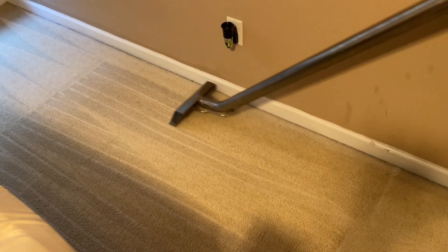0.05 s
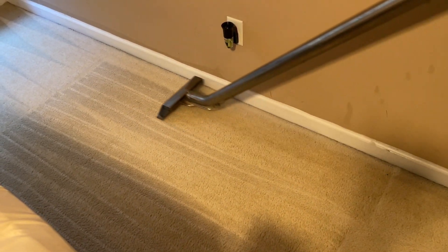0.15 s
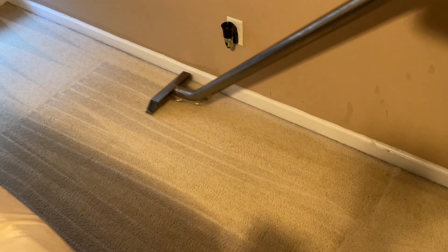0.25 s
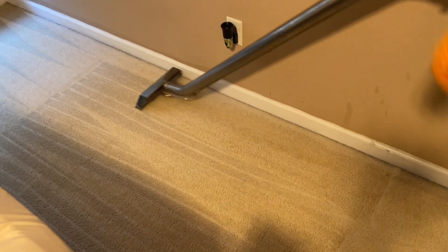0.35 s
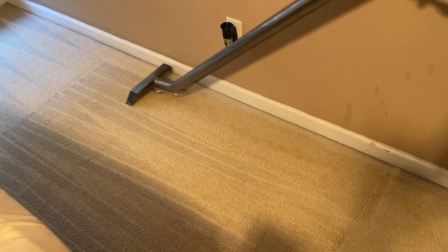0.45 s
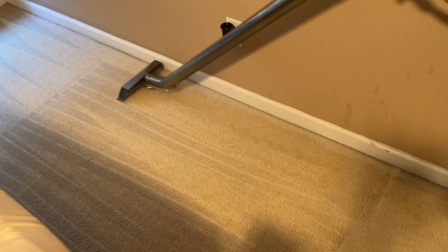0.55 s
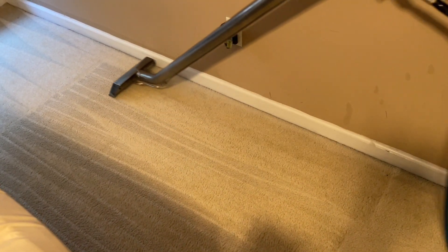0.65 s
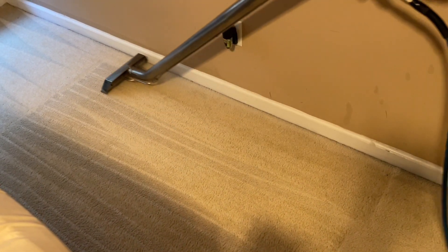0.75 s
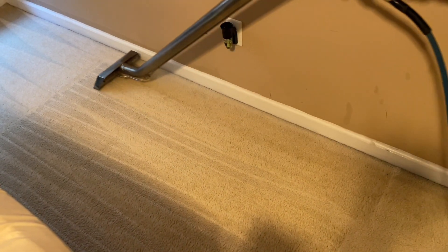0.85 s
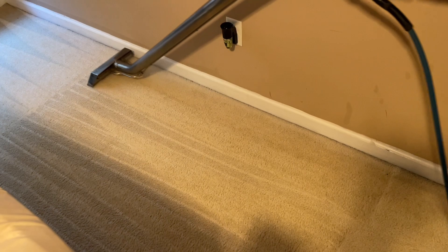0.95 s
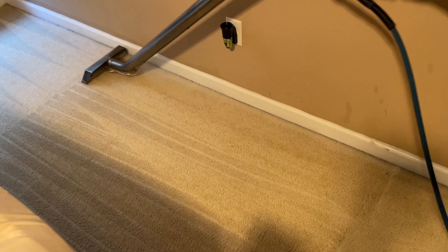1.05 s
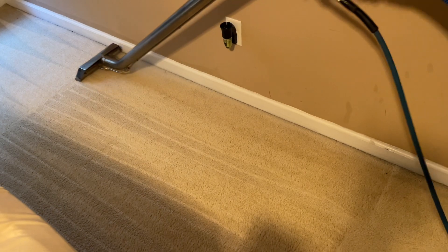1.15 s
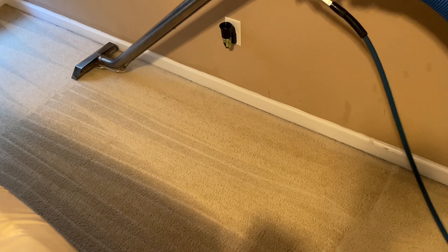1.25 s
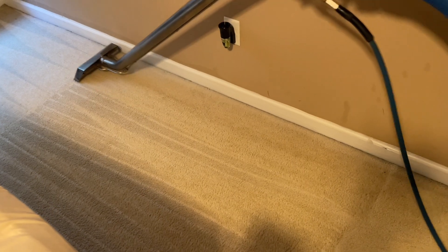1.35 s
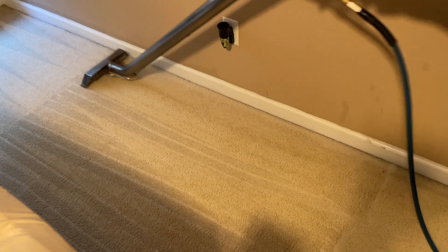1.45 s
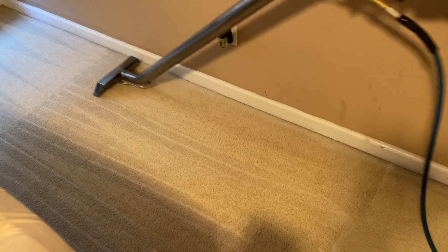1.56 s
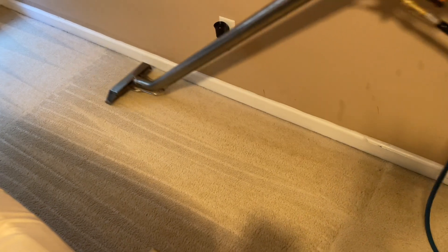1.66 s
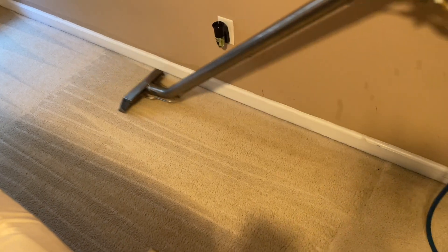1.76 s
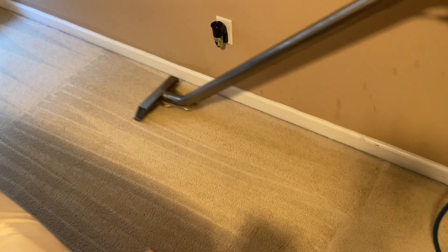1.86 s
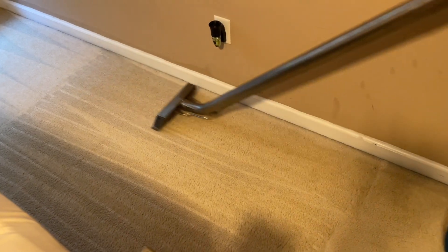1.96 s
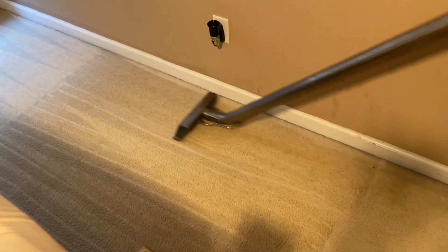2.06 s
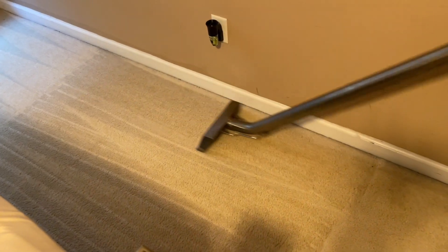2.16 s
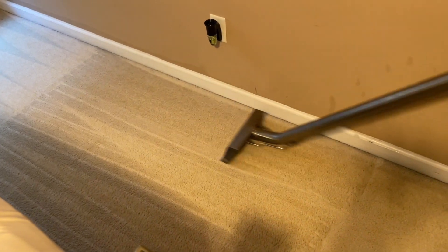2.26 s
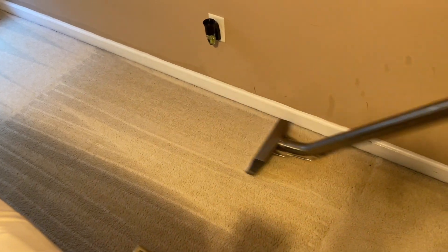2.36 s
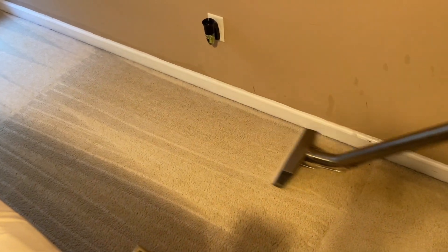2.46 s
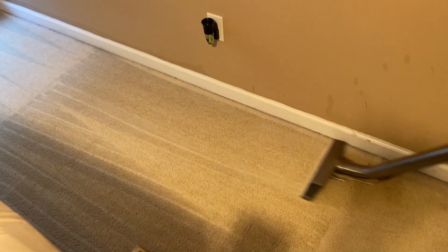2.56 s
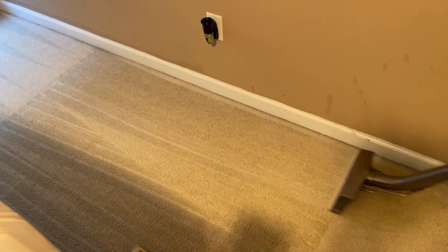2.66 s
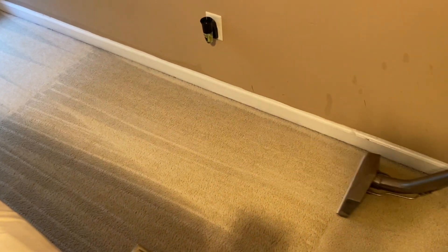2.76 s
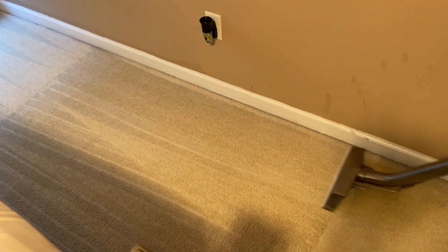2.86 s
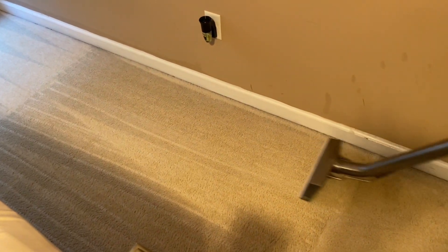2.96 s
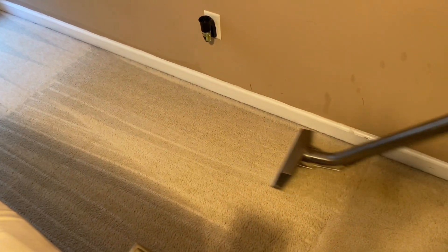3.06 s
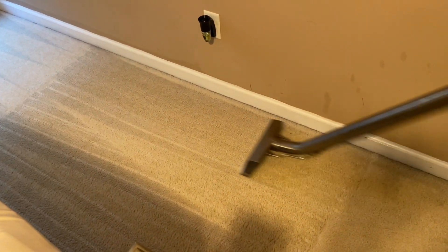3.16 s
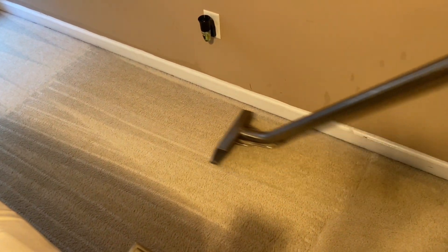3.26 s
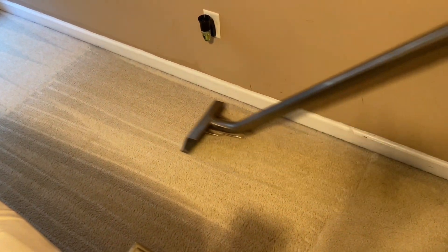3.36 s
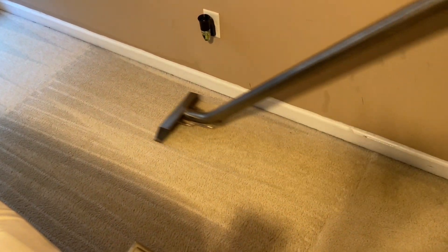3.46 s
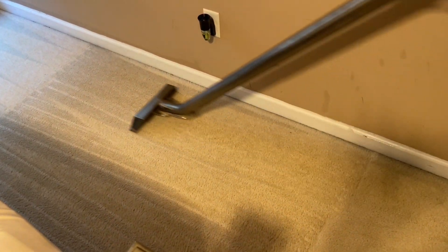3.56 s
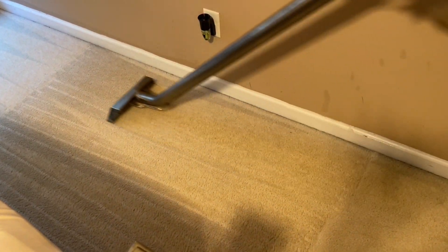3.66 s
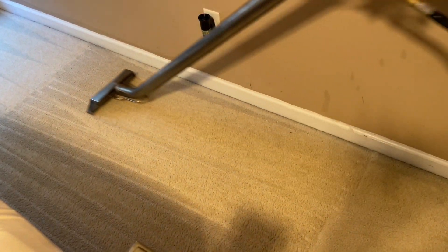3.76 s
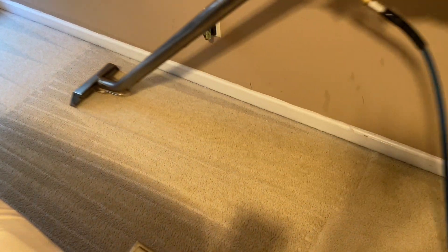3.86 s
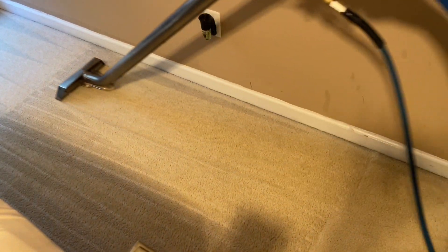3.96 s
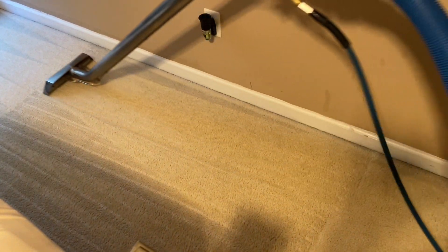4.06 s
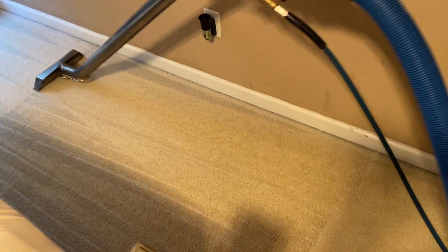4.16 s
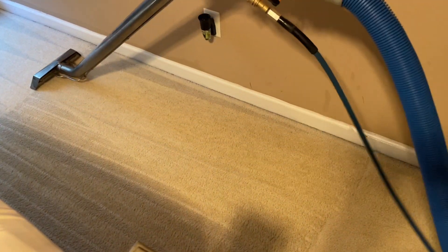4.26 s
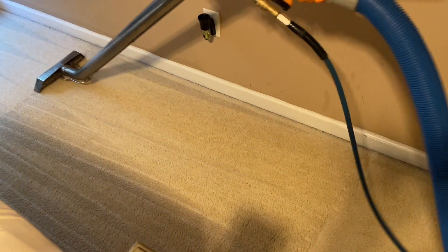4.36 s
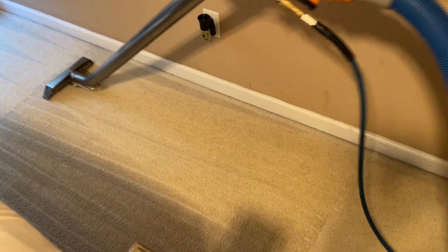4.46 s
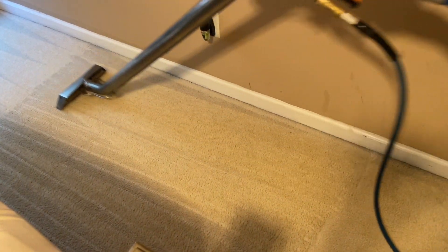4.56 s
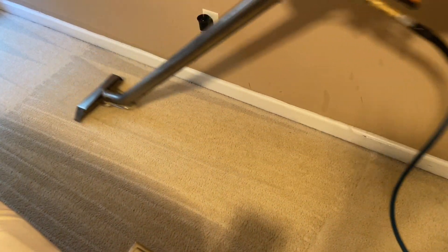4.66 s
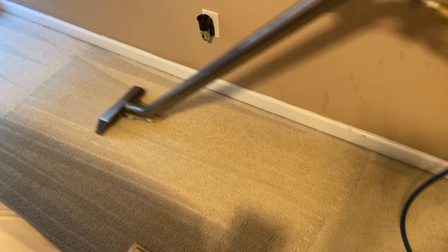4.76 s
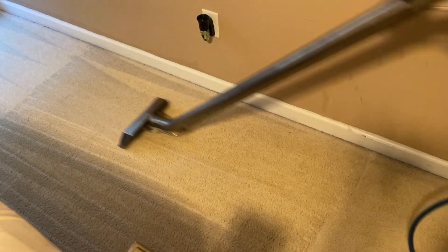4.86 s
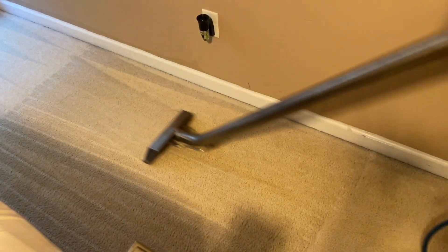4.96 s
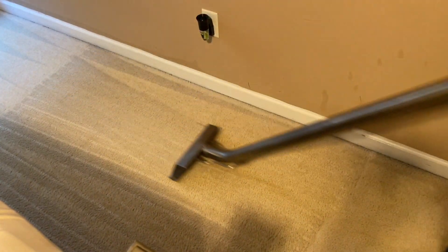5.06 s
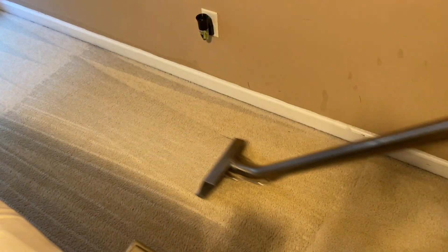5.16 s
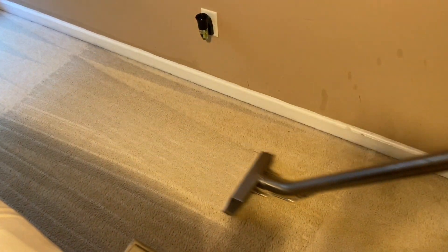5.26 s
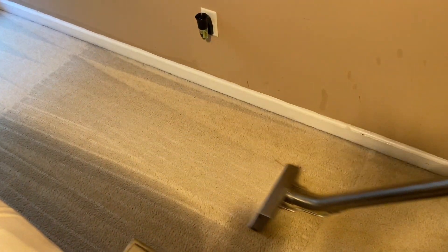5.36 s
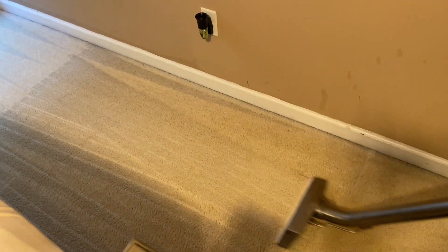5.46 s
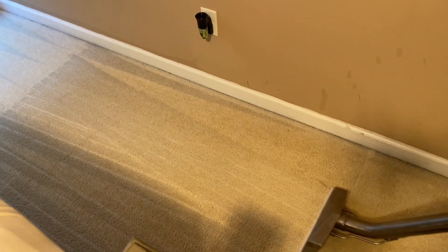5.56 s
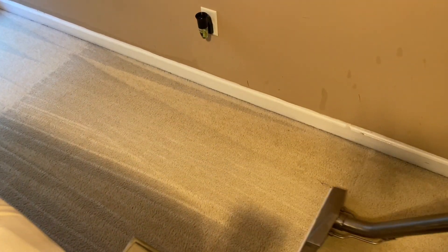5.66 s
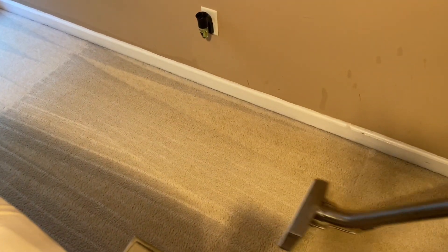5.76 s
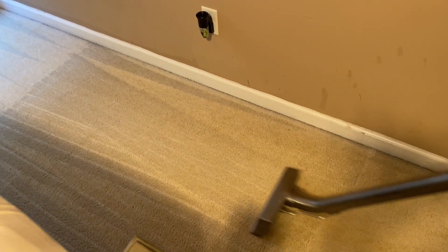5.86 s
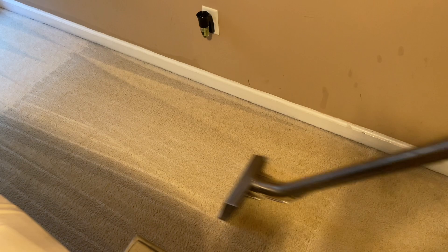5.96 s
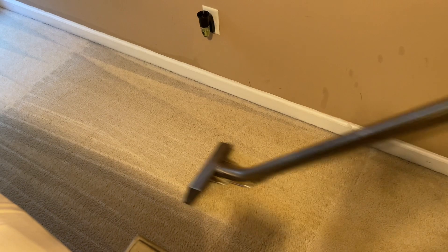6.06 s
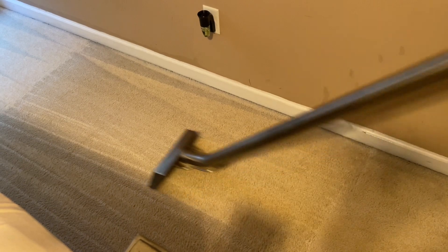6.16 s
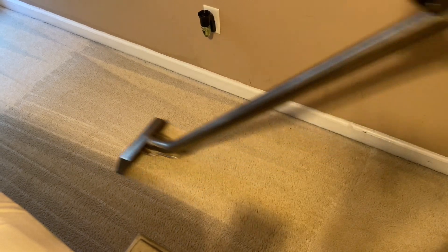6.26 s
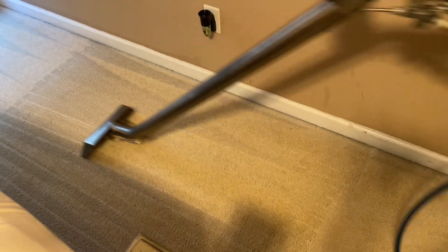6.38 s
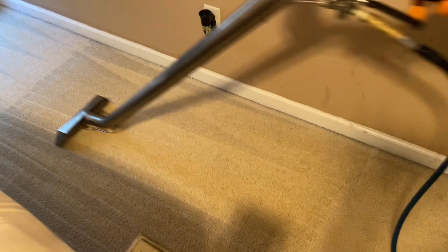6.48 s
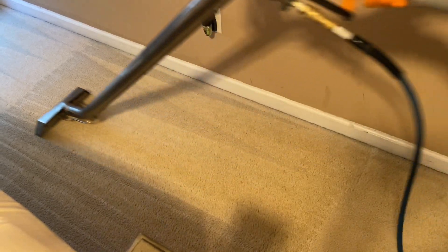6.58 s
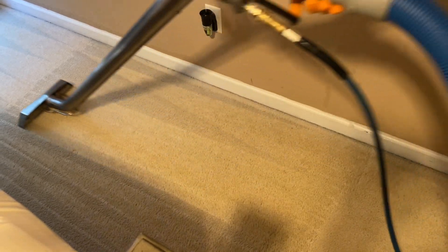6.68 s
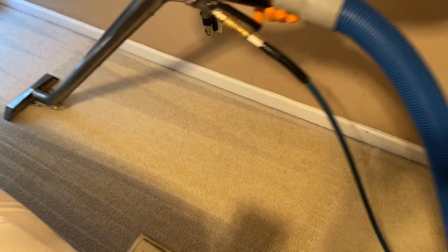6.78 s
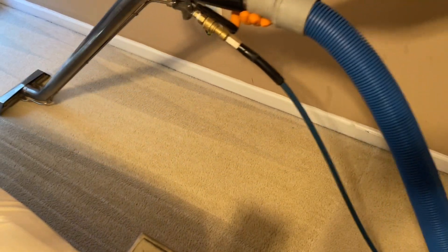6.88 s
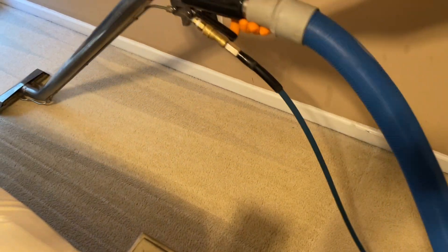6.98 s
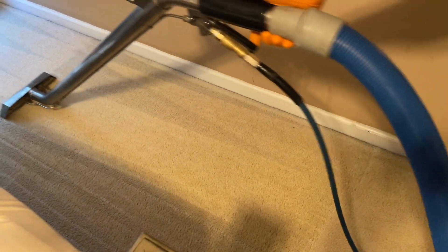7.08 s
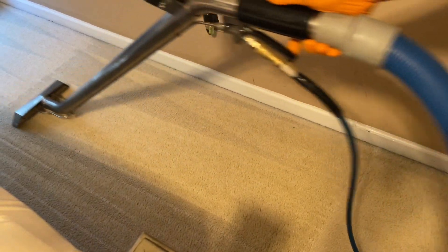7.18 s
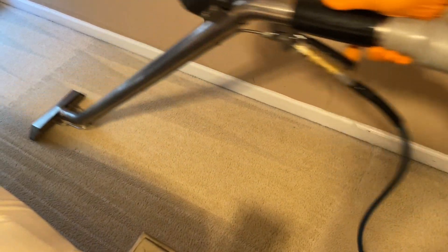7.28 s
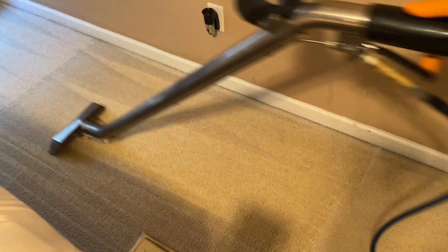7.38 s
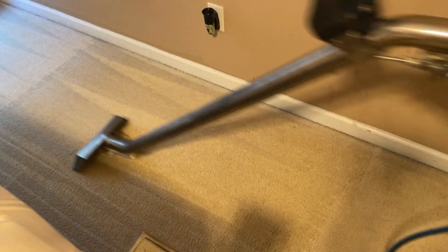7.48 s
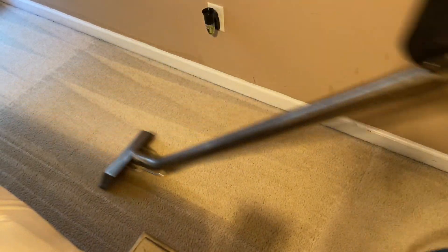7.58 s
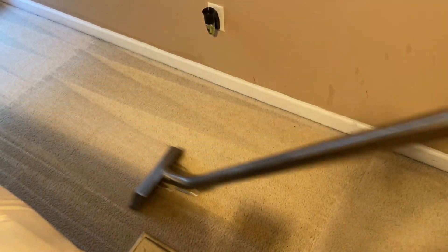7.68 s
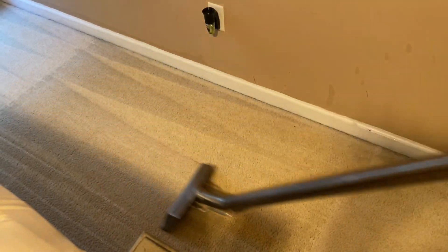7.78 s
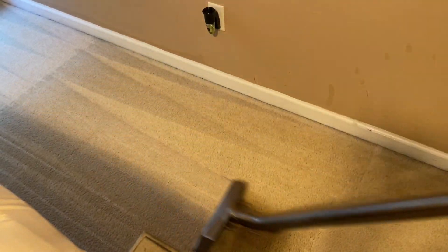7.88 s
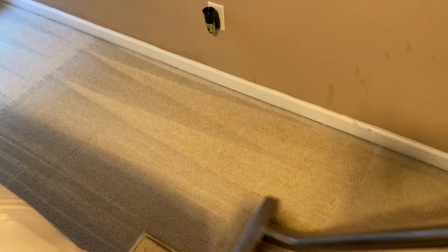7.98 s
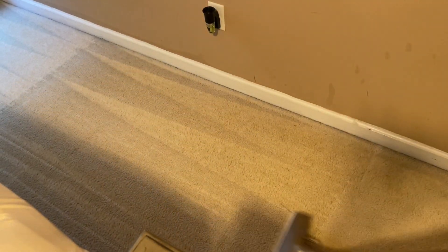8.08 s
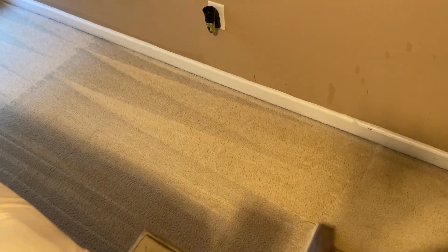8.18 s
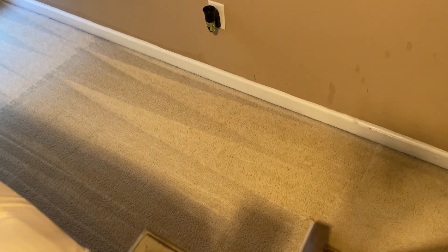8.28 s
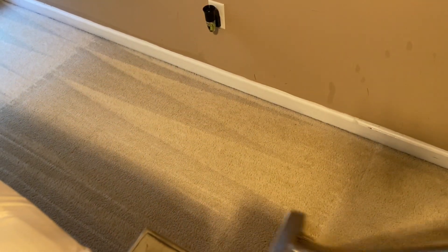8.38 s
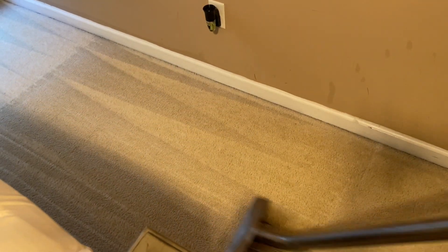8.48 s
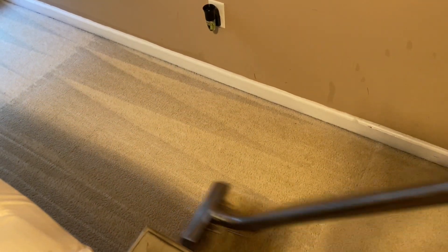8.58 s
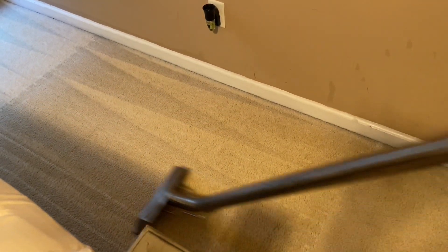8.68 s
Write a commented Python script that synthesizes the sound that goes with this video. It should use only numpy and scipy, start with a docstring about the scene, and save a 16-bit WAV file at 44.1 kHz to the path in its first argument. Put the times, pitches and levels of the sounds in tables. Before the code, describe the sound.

Steady spray over wet suction opens, then cuts off with a bright tick and tiny puff. Uneven gurgling slurps swell through three long pulls, with thinner, quieter pushes between. Raspy air and brief airy whistles come and go, the heavy hose rumbles, and dull thumps fall near some turns. Heard closely in stereo beside a wall in a small carpeted room.

```python
"""Carpet extraction wand along a wall

A wand works close by in a small carpeted room: three pulls and the pushes between them suck water from the pile.
Jets, a spray of noise and droplets, run for about a second until a valve shuts with a bright burst of noise.
Shaped noise and drops make gurgle, slurp, slot rush and fibre hiss; they rise in each stroke and fall slack at turns.
Gliding noise bands rasp, narrow ones whistle; low noise shudders the hose, and falling low tones are the wand's bumps.
A thin treble hiss sputters at the handle throughout; a hollow tube, a nearby wall and the room colour the head."""
import sys
import numpy as np
from scipy import signal
from scipy.fft import rfft, irfft, next_fast_len
from scipy.io import wavfile
from scipy.ndimage import map_coordinates

SR = 44100
rng = np.random.default_rng(int(sys.argv[2]) if len(sys.argv) > 2 else 0)


def store_wav(level_fs):
    """Save 16-bit WAV to argv[1]."""
    pcm = np.round(np.clip(np.atleast_2d(level_fs), -1, 1) * 32767)
    wavfile.write(sys.argv[1], SR, pcm.T.astype(np.int16))


N = 384993  # length in samples

# How loud the water jets are over time: time_s, level_db
JET_LEVELS = [(0, -30), (.3, -34), (.8, -33), (1.15, -34.5), (1.178, -43), (1.215, -48), (1.228, -34),
              (1.242, -46), (1.28, -53), (1.33, -76)]
# How far the head is pushed out along the wall: time_s, reach_0_to_1
HEAD_REACH = [(0, 0.6), (.75, 0.96), (1.3, 0.89), (1.8, 0.86), (2.75, 0.19), (3.5, 0.37), (4.2, 0.67),
              (4.75, 0.73), (5.62, 0.22), (6.5, 0.75), (7.0, 0.82), (7.5, 0.71), (8.27, 0.1), (8.73, 0.37)]
# Moments when the wand changes direction and the slot falls slack: time_s
TURN_TIMES = [-.3, 1.29, 2.82, 4.335, 5.7, 7.0, 8.33, 9.7]
# One row per stroke between turns, push and pull by turns; levels and let-go times are trimmed layer by layer below:
# water_arrives_s, seal_s, let_go_s, slack_rush_at_opening_turn_db, swell_along_stroke_db,
# gurgle_db, slurp_db, slot_rush_db, fibre_hiss_db, slot_pitch_hz, fibre_pitch_hz
STROKE_ROWS = [(.1, .1, 0.03, -42, -12.5, -34.5, -37.5, -37, -43, 2550, 4000),
               (0.2, 0.056, 0.17, -40, 3.5, -25, -32.5, -39.5, -40, 2500, 4650),
               (0.057, 0.12, 0.13, -45, -13.5, -31.5, -43.5, -50, -49.5, 2900, 4800),
               (0.07, 0.12, 0.19, -47, -1, -27.5, -32.5, -44.5, -44.5, 2420, 5000),
               (0.21, 0.18, 0.1, -45.5, -9, -35.5, -42.5, -52, -47.5, 2300, 4800),
               (0.11, 0.079, 0.23, -50.5, 2.5, -29.5, -35, -55, -43.5, 2430, 4800),
               (.19, 0.19, .1, -45, -0.5, -33, -45.5, -64, -52, 2480, 4900)]


def amp(db):
    """Turn decibels into a gain."""
    return 10 ** (np.asarray(db) / 20)


def unit(x):
    """Scale to rms 1."""
    return x / np.sqrt(np.mean(x ** 2) + 1e-20)


def along(points, hz):
    """Read (Hz, value) points on a log pitch axis."""
    f, v = np.transpose(points)
    return np.interp(np.log(hz + 1), np.log(f + 1), v)


def curves(rows):
    """One value per sample for each column after the time."""
    s, *cols = np.transpose(rows)
    return [np.interp(np.arange(N) / SR, s, c) for c in cols]


def wobble(rate):
    """A smooth random curve through so many random points a second."""
    points = rng.standard_normal(int(N * rate / SR) + 4)
    return map_coordinates(points, [np.arange(N) * rate / SR])


def swell(s, half_s):
    """A smooth bell of height 1 around time s; half_s is its standard deviation."""
    return np.exp(-.5 * ((np.arange(N) / SR - s) / half_s) ** 2)


def ease(x):
    """A soft step from 0 to 1 as x goes from 0 to 1."""
    return np.sin(np.pi / 2 * np.clip(x, 0, 1)) ** 2


def filtered(x, response):
    """Multiply the spectrum of x by a response that depends on frequency."""
    m = next_fast_len(N + SR // 4)
    return irfft(rfft(x, m) * response(np.fft.rfftfreq(m, 1 / SR)), m)[..., :N]


def white():
    """Turbulence: two unrelated streams of white noise."""
    return rng.standard_normal((2, N))


def drops(rate, spread_db):
    """Randomly timed droplet impacts of uneven size, rate of them a second, scaled to rms 1."""
    hits = rng.random(N) < rate / SR
    sizes = amp(spread_db * rng.uniform(-0.65, 1, N))
    return unit(hits * white() * sizes)


def voiced(drive, spectrum):
    """Colour two streams and spread them over a microphone pair; the average of left and right has rms 1."""
    # How alike the two microphones sound: frequency_hz, likeness_0_to_1
    likeness = [(30, .88), (70, .96), (150, .98), (350, .83), (680, .42), (1150, .64), (2200, .75),
                (3600, .5), (4700, .7), (5700, .35), (7200, .93), (9000, .85), (12800, .72), (14500, .9)]
    # How far the left microphone leads: frequency_hz, lead_radians
    left_lead = [(100, 0), (450, .3), (1000, 0), (1700, -.45), (2600, .6), (3300, .7), (4500, .1),
                 (5300, 0), (6100, -1.8), (7000, -3.1), (8000, -3.6), (9000, -4.4), (11000, -6.3),
                 (13500, -8.8), (15800, -10.2)]

    def mix(hz):
        """Share the colour between a common stream and one that differs in sign."""
        turn = np.arccos(np.clip(along(likeness, hz), 0, 1)) / 2
        return amp(along(spectrum, hz)) * np.array([np.cos(turn), np.sin(turn)])

    def lead(hz):
        """Turn left forward and right back by half the lead each."""
        return np.exp(.5j * np.outer([1, -1], along(left_lead, hz)))

    common, apart = filtered(drive, mix)
    pair = filtered(np.array([common + apart, common - apart]), lead)
    return pair / np.std(pair.mean(0))


def panned(x, left_db):
    """Make the left side louder than the right by left_db."""
    return x * amp(np.array([[.5], [-.5]]) * left_db)


def swept(x, centre_hz, width_hz, boost_db):
    """Pass x through a gliding resonance (a dip if boost_db is negative), keeping its overall level."""
    hz, t, z = signal.stft(x, SR, nperseg=1024)
    centre = np.interp(t, np.arange(N) / SR, centre_hz)
    gain = amp(boost_db / (1 + (2 * (hz[:, None] - centre) / width_hz) ** 2))
    out = signal.istft(z * gain, SR, nperseg=1024)[1][:, :N]
    return out * np.std(x) / np.std(out)


def jets():
    """Pressurised water hisses out and its droplets pepper the pile."""
    # Colour of the spray: frequency_hz, relative_level_db_per_hz
    spray_colour = [(150, -13), (500, 1), (850, -12), (1200, 4), (1600, -8), (1850, -4.5), (2300, -2),
                    (3400, -5.5), (4900, -7.5), (6200, -3.5), (8000, -5), (10000, -9), (12500, -15.5),
                    (15500, -16)]
    spray = voiced(white() + .4 * drops(3000, spread_db=4), spray_colour)
    level_db = curves(JET_LEVELS)[0] + 0.41 * wobble(30.0)
    return panned(spray * amp(level_db), left_db=1.7 * curves(HEAD_REACH)[0])


def jetting():
    """Flow through the jets as a share of the opening flow, from the level of their spray."""
    return np.clip(amp(curves(JET_LEVELS)[0] - JET_LEVELS[0][1]), 0, 1)


def leak():
    """Air escapes at the handle as a thin, sputtering hiss, partly giving way while the jets run."""
    # Colour of the hiss: frequency_hz, relative_level_db_per_hz
    leak_colour = [(2000, -34), (6000, -55), (8000, 8), (11000, 7.5), (13000, 5), (14300, 5), (15600, 11.5)]
    # Rise and fall of the hiss, before the overall lift below: time_s, relative_level_db
    leak_levels = [(0.0, -54), (0.09, -45.5), (0.97, -49), (1.46, -53.5), (1.97, -52), (3.04, -59.5),
                   (3.55, -55.5), (4.74, -57.5), (4.89, -54.5), (4.98, -56), (5.86, -58), (6.59, -59.5),
                   (6.73, -55.5), (8.12, -55.5), (8.53, -61), (8.73, -59)]
    # Pitch of its resonance as the handle turns: time_s, pitch_hz
    leak_pitch = [(0, 10500), (2.3, 10000), (3.1, 9500), (3.55, 11500), (4.9, 11600), (5.6, 9500),
                  (6.3, 9500), (6.7, 12000), (7.2, 12400), (7.65, 10600), (8.73, 10500)]
    hiss = voiced(white() + 0.37 * drops(650, spread_db=4), leak_colour)
    hiss = swept(hiss, curves(leak_pitch)[0], width_hz=4300, boost_db=4.0)
    sputter_db = 0.97 * wobble(22) + 0.56 * wobble(83)
    return hiss * amp(curves(leak_levels)[0] + 8 + sputter_db - 3.0 * jetting())


def stroking():
    """For each sample: the row of its stroke, seconds since and until a turn, and the way through from -.5 to .5."""
    t = np.arange(N) / SR
    stroke = np.searchsorted(TURN_TIMES, t) - 1
    since = t - np.take(TURN_TIMES, stroke)
    until = np.take(TURN_TIMES, stroke + 1) - t
    return np.array(STROKE_ROWS)[stroke].T, since, until, since / (since + until) - .5


def flows():
    """Levels in dB of gurgle, slurp, slot and fibres: each stroke seals, arches over its middle and lets go."""
    row, since, until, way = stroking()
    fill_s, close_s, release_s, _, swell_db, gurgle, slurp, slot, fibre, _, _ = row
    slack_at_turns = [db for _, _, _, db, *_ in STROKE_ROWS]
    slack = np.interp(np.arange(N) / SR, TURN_TIMES[:-1], slack_at_turns)

    def drawn(db, seal_s, let_go_s, swell_share, arch_db, slack_db):
        """One layer rises out of its slack rush and falls back."""
        held = amp(db + swell_share * swell_db * way - arch_db * (2 * way) ** 2)
        sealed = ease(since / seal_s) * ease(until / let_go_s)
        return 20 * np.log10(np.hypot(sealed * held, amp(slack_db)))

    return (drawn(gurgle, fill_s, release_s, swell_share=0.72, arch_db=4.5, slack_db=-43.5),
            drawn(slurp, close_s, 1.01 * release_s, swell_share=0.96, arch_db=1.5, slack_db=slack),
            drawn(slot, 0.03, 0.45 * release_s, swell_share=0.1, arch_db=6.5, slack_db=slack - 1.5),
            drawn(fibre, 0.022, .5 * release_s, swell_share=0.086, arch_db=4.0, slack_db=slack - 3.0))


def suction():
    """Slugs of water choke the slot by turns: the head gurgles, and the air tears the water into drops."""
    # Colours of the four layers: frequency_hz, relative_level_db_per_hz
    gurgle_colour = [(40, -28), (80, -8.5), (110, 0.5), (148, -0.5), (162, -13.5), (178, 1.5), (240, -3),
                     (310, -2.1), (370, -5), (460, -7.5), (550, -7.5), (660, -19), (1500, -24.5),
                     (5000, -90)]
    slurp_colour = [(200, -39), (420, -10), (560, -6.5), (660, -6), (810, -2), (1050, -3), (1400, -4.5),
                    (1650, -4.5), (1920, -15), (2600, -14), (5000, -36.5), (16000, -56)]
    slot_colour = [(700, -31), (1800, 1.5), (2150, 1), (2600, 1.5), (3300, -1), (4200, -1), (6500, -55),
                   (16000, -45)]
    fibre_colour = [(1500, -42), (3200, -1), (4200, -2), (5200, 0.5), (6200, 3.5), (7700, 1.5),
                    (10000, 1.5), (12000, -22), (16000, -33)]
    # Uneven water: big slugs gulped down (+) or the slot running briefly dry (-):
    # centre_s, half_length_s, gurgle_lift_db, slurp_lift_db
    water_slugs = [(0.125, 0.037, 7, 3), (1.196, .03, 6, 0.5), (1.34, .02, 7.5, 0), (1.462, .035, -2, -2.5),
                   (1.528, .012, 2.5, -2), (1.596, .015, 3.5, 1.5), (1.688, .025, 3, -1),
                   (1.78, 0.035, -3, -1.5), (1.848, 0.011, 1.5, 0.5), (1.884, .015, -3.5, 2.5),
                   (2.004, 0.052, 3, 3), (2.14, .025, 1.5, 1), (2.232, .025, 2.5, 4),
                   (2.34, 0.016, -1.5, 1.5), (2.42, 0.023, 2.5, 2.5), (2.466, .015, 0, 1.5),
                   (2.5, 0.014, 1.5, -0.5), (2.62, .02, 1.5, 1), (3.005, 0.034, -1.5, -1),
                   (3.077, 0.015, 4, 1.5), (3.59, 0.041, -5.5, -3.5), (4.477, .012, 5, 0.5),
                   (4.508, .015, -0.5, -1.5), (4.55, 0.022, 4.5, -0.5), (4.73, 0.028, 4.5, 1.5),
                   (4.79, 0.025, -2, -2), (4.964, 0.041, 1, 3), (5.48, .03, 2, -2),
                   (5.817, 0.054, 1.5, -0.5), (5.94, .045, 2.5, -1.5), (6.04, 0.017, 0, 0.5),
                   (6.228, 0.022, 1, -0.5), (6.327, 0.04, 3, 3), (6.453, .025, 2, 2.5),
                   (6.616, 0.052, 0.5, -2), (6.75, .035, 2.5, 3), (6.895, 0.017, 2, -0.5),
                   (7.175, 0.013, 5, 0.5), (7.273, 0.019, 2, 0), (7.395, .02, -4, -0.5),
                   (7.444, 0.011, 6, 3.5), (7.533, .018, 2.5, 3), (7.59, 0.021, -4, -1.5),
                   (7.88, .025, 0.5, 2.5), (8.04, 0.042, 4, 4), (8.15, 0.028, 4.5, 2.5),
                   (8.267, 0.019, 0, 1), (8.42, .035, 0.5, -0.5), (8.67, 0.036, 2, 0)]
    # Air spits in under a corner of the slot: centre_s, half_length_s, slot_lift_db
    air_spits = [(1.373, 0.06, 6.5), (3.363, 0.033, 6), (4.567, 0.02, 8), (4.728, .037, 3),
                 (5.442, 0.021, 4), (7.29, .025, 7.5), (8.34, 0.015, 3.5)]
    # Pitch of the slurp's resonance, set by the open length of the slot: time_s, pitch_hz
    slurp_pitch = [(0.0, 960), (0.41, 1130), (1.6, 1080), (2.45, 920), (2.7, 1220), (3.7, 1150),
                   (4.03, 870), (4.3, 900), (4.45, 1270), (4.65, 1160), (5.45, 980), (5.74, 1290),
                   (6.15, 1130), (6.7, 1000), (7.2, 937), (7.65, 1000), (7.95, 1080), (8.73, 990)]
    gurgle_hz = 228  # hollow resonance of the head
    throat_hz, throat_growth = 403, 0.26  # gurgle above this pitch gains so many dB more per dB of flow
    slot_glide_hz, fibre_glide_hz = -450, 100  # change of pitch from start to end of a stroke

    reach, = curves(HEAD_REACH)
    (*_, slot_hz, fibre_hz), _, _, way = stroking()
    gurgle_db, slurp_db, slot_db, fibre_db = flows()
    gulp_db, suck_db = sum(np.outer(lifts_db, swell(s, half_s)) for s, half_s, *lifts_db in water_slugs)
    spit_db = sum(db * swell(s, half_s) for s, half_s, db in air_spits)
    surge = wobble(15)
    choke = wobble(30) + wobble(150)

    # more flow opens the throat of the gurgle
    flow_db = gurgle_db - gurgle_db.mean()
    gurgle = voiced(white(), gurgle_colour)
    throat = filtered(gurgle, lambda hz: hz ** 6 / (hz ** 6 + throat_hz ** 6))
    gurgle = gurgle + throat * (amp(throat_growth * flow_db - 1.77) - 1)
    gurgle = swept(gurgle, np.full(N, gurgle_hz), width_hz=280, boost_db=3.0)
    gurgle = gurgle * amp(gurgle_db - 2.0 + gulp_db + 0.3 * surge + 0.63 * choke)

    slurp = voiced(white() + 0.68 * drops(700, spread_db=4.0), slurp_colour)
    slurp = swept(slurp, curves(slurp_pitch)[0], width_hz=340, boost_db=1.5)
    slurp = slurp * amp(slurp_db - 2.0 + suck_db + .35 * spit_db + .5 * surge + 0.64 * choke)

    # the hissing layers fade as the head moves away
    slot = voiced(white() + 0.49 * drops(700, spread_db=3.0), slot_colour)
    slot = swept(slot, slot_hz + slot_glide_hz * way, width_hz=380, boost_db=-0.5)
    slot = slot * amp(slot_db - 3.5 + spit_db - 2.0 * (reach - .5) + 1.0 * choke)

    fibres = voiced(white() + .4 * drops(1000, spread_db=4), fibre_colour)
    fibres = swept(fibres, fibre_hz + fibre_glide_hz * way, width_hz=2300, boost_db=7.0)
    fibres = fibres * amp(fibre_db - 1.6 - 4.6 * (reach - .5) + 0.81 * wobble(25))

    low = panned(gurgle, left_db=-1.0) + panned(slurp, left_db=-.3 + 6.3 * reach)
    return low + panned(slot, left_db=1.5 + 2.5 * reach) + panned(fibres, left_db=0.5)


def hose():
    """The heavy hose shudders, more when near and as it swings, and the wand bumps dully on the floor."""
    # Colour of the shudder: frequency_hz, relative_level_db_per_hz
    shudder_colour = [(20, -26), (35, -15), (50, -6), (70, 2), (90, -1.5), (120, -29), (200, -34),
                      (500, -90)]
    # The hose swings as the wand turns round: centre_s, half_length_s, level_db
    hose_swings = [(1.13, 0.026, -46), (3.136, 0.098, -40), (4.25, 0.3, -42.5), (5.516, 0.036, -42),
                   (5.88, 0.081, -38), (6.12, 0.13, -36), (8.54, 0.15, -38)]
    # Dull bumps of the wand: centre_s, half_length_s, level_db, pitch_at_centre_hz
    wand_bumps = [(4.005, .016, -31, 64), (4.09, .016, -31, 78), (4.291, 0.0069, -23.5, 88),
                  (4.411, 0.0084, -29, 72), (5.861, 0.014, -31, 78), (5.94, 0.0062, -23, 85),
                  (8.397, .015, -31, 70), (8.48, .012, -34, 75.5), (8.519, 0.011, -23.5, 82),
                  (8.595, 0.0089, -27, 82)]
    sag_hz_per_s = 880  # a bump's pitch falls as the carpet gives

    _, since, until, _ = stroking()
    drag = amp(-39.5 - 13.0 * curves(HEAD_REACH)[0]) * ease(since / 0.17) * ease(until / 0.16)
    swings = sum(amp(db) * swell(s, half_s) for s, half_s, db in hose_swings)
    sound = voiced(white(), shudder_colour) * np.hypot(drag, swings) * amp(1.2 * wobble(20))
    for s, half_s, db, hz in wand_bumps:
        t = np.arange(N) / SR - s
        tone = np.cos(2 * np.pi * (hz - sag_hz_per_s * t / 2) * t)
        sound = sound + amp(db) * swell(s, half_s) * tone
    return sound


def valve():
    """The brass trigger valve ticks shut brightly, then lets out a last short puff, both bursts of noise."""
    # Colour of the valve: frequency_hz, relative_level_db_per_hz
    brass_colour = [(500, -6), (3000, -27), (6000, -5), (8500, -2), (9700, 3), (11000, -8), (16000, -12)]
    # Tick and puff: start_s, level_db, hold_s, time_to_fall_60_db_s
    valve_bursts = [(1.1602, -25.5, .002, .018), (1.2222, -33.5, .007, .03)]
    t = np.arange(N) / SR
    blows = 0
    for s, db, hold, t60 in valve_bursts:
        fall_db = 60 * np.maximum(t - s - hold, 0) / t60
        blows = blows + (t >= s) * amp(db - fall_db)
    return voiced(white(), brass_colour) * blows


def rasps():
    """Air rushes through gaps under the lip: noise bands, hollow when low and raspy when high, swell and fade."""
    # Even colour within the range of interest: frequency_hz, relative_level_db_per_hz
    air_colour = [(2000, 0), (9000, 0)]
    # Bands that glide as the wand tilts: start_s, end_s, level_db, first_pitch_hz, last_pitch_hz, width_hz
    air_bands = [(1.26, 1.85, -43, 2050, 2350, 1200), (1.28, 1.49, -45, 730, 750, 150),
                 (1.48, 1.95, -39, 620, 420, 90), (1.82, 2.41, -45, 3890, 4070, 1840),
                 (2.06, 2.71, -50, 5400, 5200, 1300), (2.1, 2.6, -39, 800, 795, 90),
                 (2.3, 2.95, -50, 7880, 7600, 1400), (2.92, 3.45, -51, 4350, 3600, 1400),
                 (3.21, 4.24, -53, 2900, 2600, 1100), (3.98, 4.35, -48.5, 810, 880, 100),
                 (4.62, 5.3, -46.5, 3450, 1950, 450), (5.06, 6.4, -59, 7700, 8200, 1400),
                 (5.16, 5.7, -47.5, 5460, 4270, 2200), (5.16, 6.29, -55.5, 2050, 1770, 180),
                 (5.31, 5.66, -42, 670, 590, 160), (5.87, 6.11, -42.5, 850, 860, 100),
                 (6.09, 6.19, -42, 1140, 1130, 80), (6.67, 6.82, -51, 1450, 1400, 550),
                 (7.06, 7.38, -55, 2700, 2400, 1100), (7.31, 7.92, -48.5, 1430, 1260, 150),
                 (7.58, 7.82, -40, 545, 550, 80), (7.7, 8.28, -38.5, 546, 435, 230),
                 (7.75, 8.35, -57, 7700, 7900, 1800), (7.88, 8.33, -45.5, 5200, 5080, 650),
                 (7.94, 8.27, -53, 4000, 3800, 1400)]
    hz, t, z = signal.stft(voiced(white(), air_colour), SR, nperseg=512)
    gain = 0
    for start, end, db, first_hz, last_hz, width_hz in air_bands:
        way = np.clip((t - start) / (end - start), 0, 1)
        centre_hz = first_hz + (last_hz - first_hz) * way
        band = 1 / (1 + (2 * (hz[:, None] - centre_hz) / width_hz) ** 4)
        gain = gain + amp(db) * np.sin(np.pi * way) * unit(band)
    return signal.istft(z * gain, SR, nperseg=512)[1][:, :N] * amp(1.6 * wobble(25))


def whistles():
    """Airy edge tones at the lip of the slot: narrow bands of noise that swell and fade."""
    # Brief whistles: centre_s, half_length_s, level_db, pitch_hz
    lip_tones = [(6.13, .025, -46, 5350), (6.13, 0.028, -53, 7950), (6.33, 0.011, -46, 5050),
                 (8.35, .035, -48, 4400)]
    out = np.zeros((2, N))
    for s, half_s, db, centre_hz in lip_tones:
        tone = unit(filtered(white(), lambda hz: 1 / (1 + ((hz - centre_hz) / 320) ** 2)))
        out += tone * amp(db) * swell(s, half_s)
    return out


def tube(x, round_trip_s, return_db):
    """The hollow wand lifts or dips a few bands, and its far end returns the sound as a fine comb."""
    # Resonances of head and tube: centre_hz, width_hz, boost_db
    resonances = [(173, 20, 1.5), (302.5, 22.5, 4), (443.4, 33, 5.5), (830, 18, 1.5), (1820, 180, -1.5),
                  (2130, 120, 1.2)]

    def lift(hz):
        """Gain of all the resonances together."""
        return amp(sum(db / (1 + (2 * (hz - centre) / width) ** 2) for centre, width, db in resonances))

    def comb(hz):
        """The sound plus its delayed return, which is weak in the bass and the treble."""
        delay = np.exp(-2j * np.pi * hz * round_trip_s)
        return 1 + amp(return_db) * delay * hz ** 2 / (hz ** 2 + 350 ** 2) / (1 + (hz / 5000) ** 2)

    return filtered(x, lambda hz: lift(hz) * comb(hz))


def wall(x, echo_db):
    """The wall returns one near reflection with a changing delay: a hollow colour that drifts with the stroke."""
    # Delay of the reflection: time_s, delay_ms
    echo_delay = [(0, 1.16), (1.4, 1.34), (2.5, 1.8), (3.1, 1.26), (4.2, 1.37), (4.55, 0.86), (5.3, 1),
                  (6.0, 1.2), (7.2, 1.1), (7.7, 1.6), (8.73, 1.63)]
    place = np.arange(N) - curves(echo_delay)[0] * SR / 1000
    echo = np.array([np.interp(place, np.arange(N), side) for side in x])
    echo = filtered(echo, lambda hz: hz ** 2 / (hz ** 2 + 500 ** 2) / (1 + (hz / 3500) ** 2))
    return x + amp(echo_db) * echo


def room(x, t60):
    """Bare walls over a carpet give a short answer above the bass; its pattern shifts as the head travels."""
    t = np.arange(SR // 4) / SR
    angle = 11 * curves(HEAD_REACH)[0]  # radians, blends two random echo patterns
    answer = 0
    for share in (np.cos(angle), np.sin(angle)):
        tail = rng.standard_normal((2, len(t))) * amp(-60 * t / t60) * (t > .003)
        tail /= np.linalg.norm(tail, axis=1, keepdims=True)
        answer = answer + share * signal.oaconvolve(x, tail, axes=1)[:, :N]
    return filtered(answer, lambda hz: hz ** 2 / (hz ** 2 + 450 ** 2) / (1 + (hz / 7000) ** 2))


def scene():
    """The head sounds through tube and wall, the wand's sounds fill the room, and handle and hose stay dry."""
    head = tube(suction() + jets(), round_trip_s=.0083, return_db=-24)
    wand = wall(head, echo_db=-10.5) + valve() + whistles() + rasps()
    return wand + amp(-7.0) * room(wand, t60=0.098) + leak() + hose()


def record(dry):
    """The pick-up passes nothing above its upper limit."""
    top_hz = 15830
    return filtered(dry, lambda hz: hz < top_hz)


dry = scene()
out = record(dry)
store_wav(out)
```